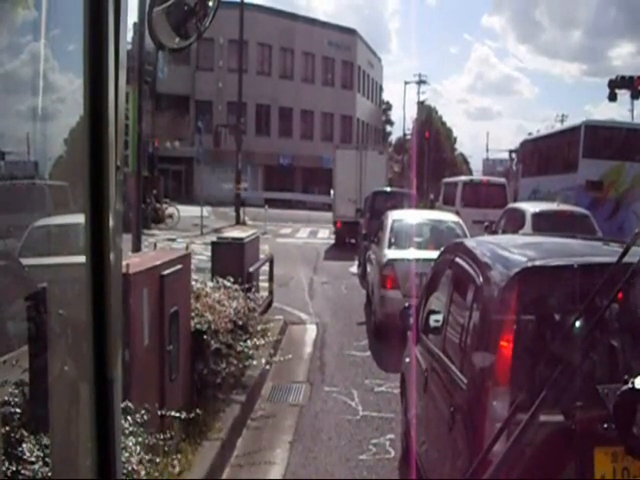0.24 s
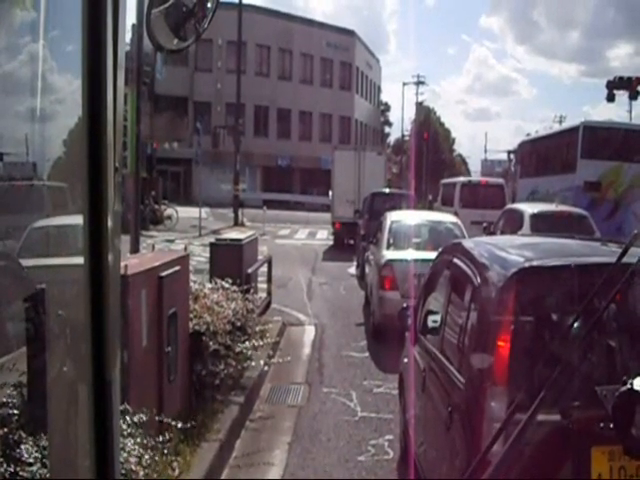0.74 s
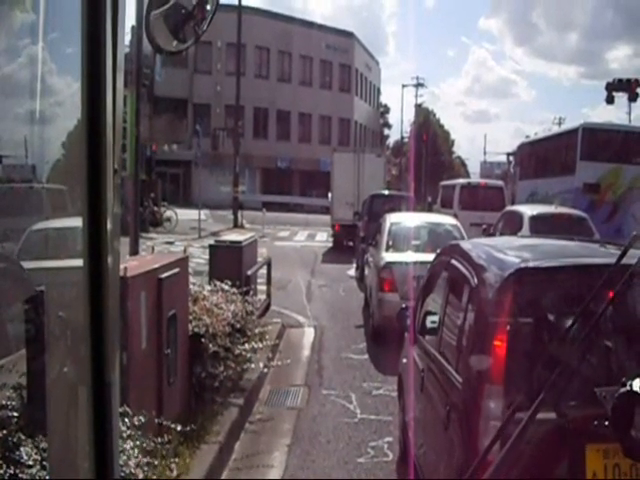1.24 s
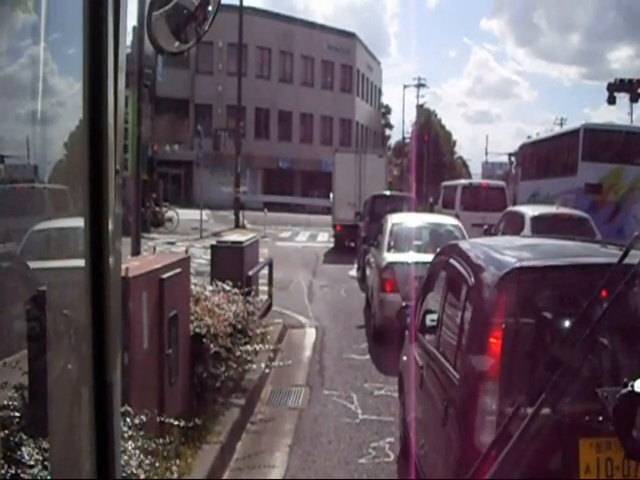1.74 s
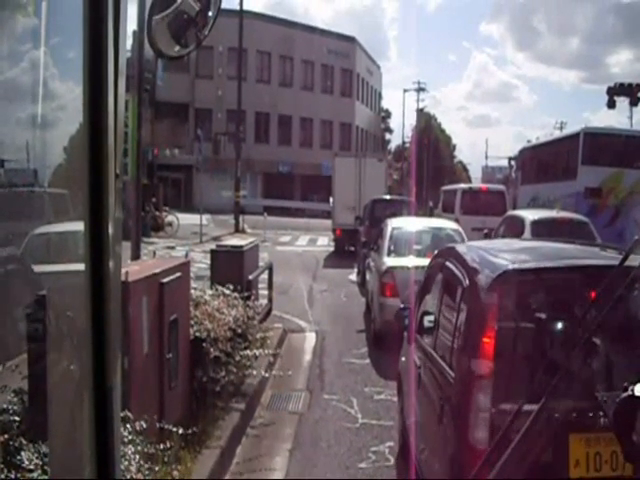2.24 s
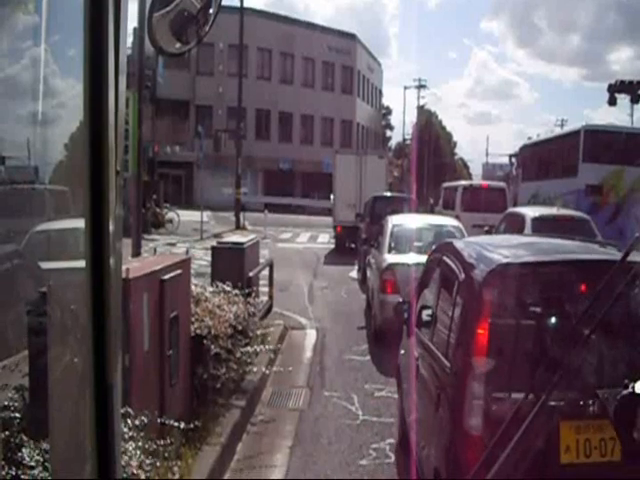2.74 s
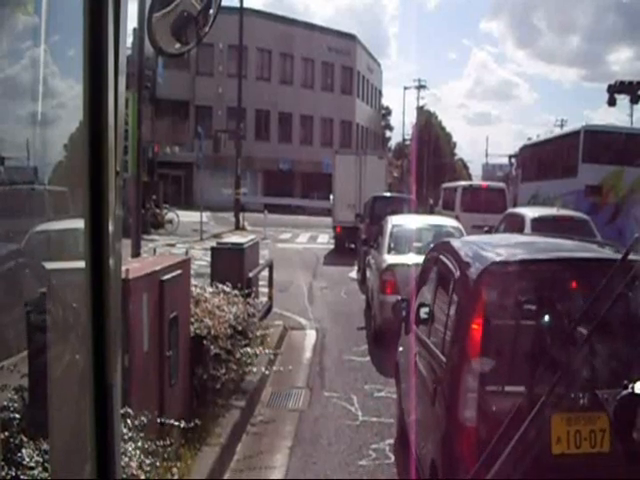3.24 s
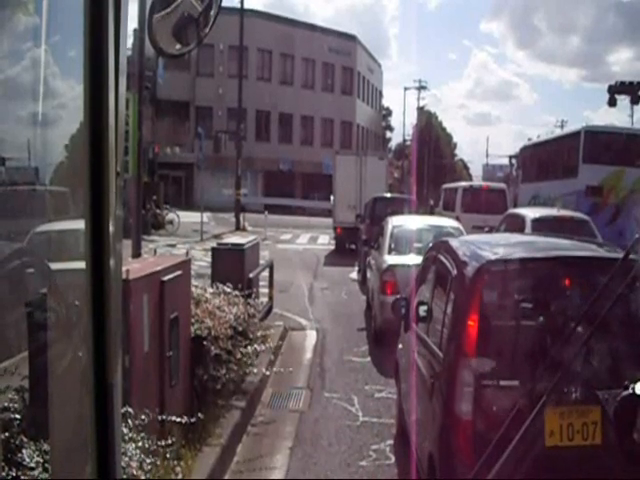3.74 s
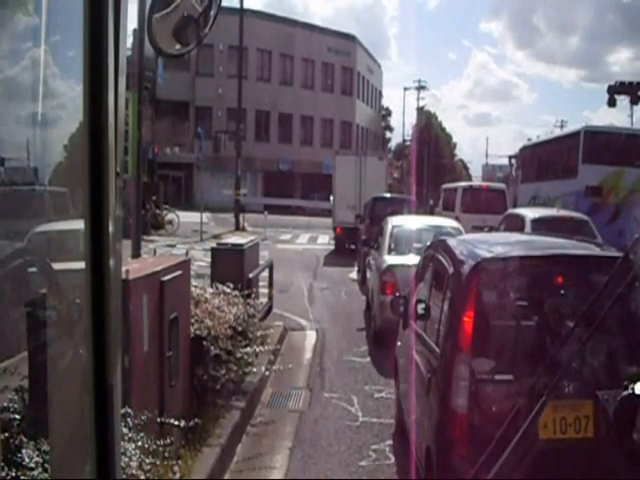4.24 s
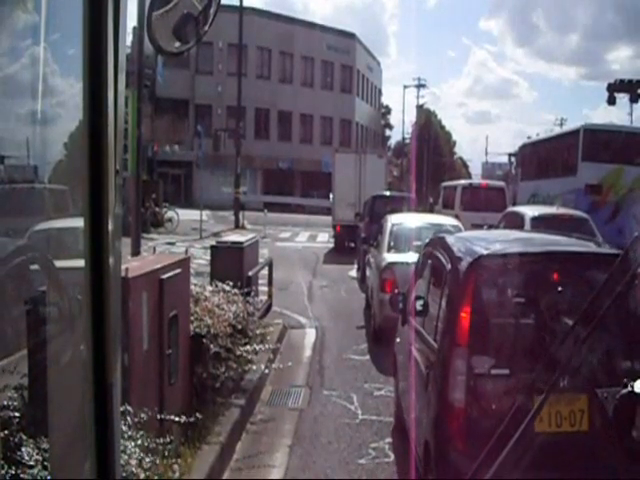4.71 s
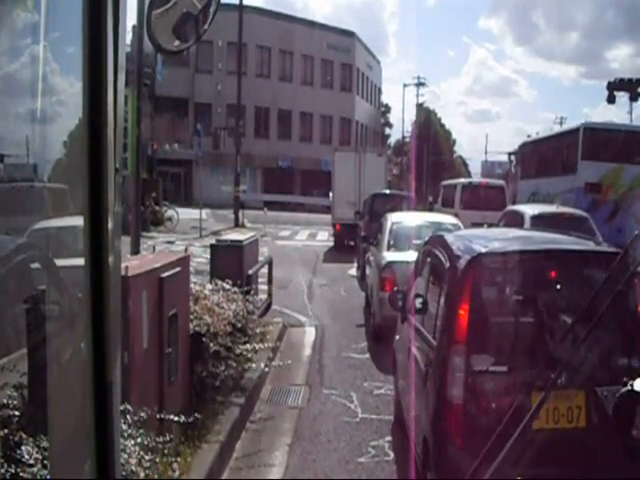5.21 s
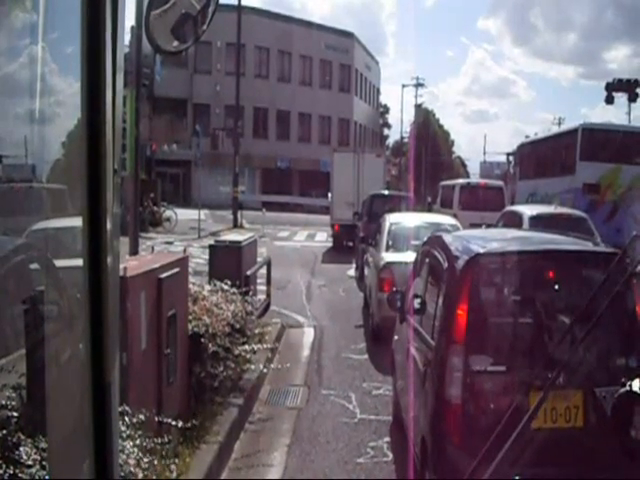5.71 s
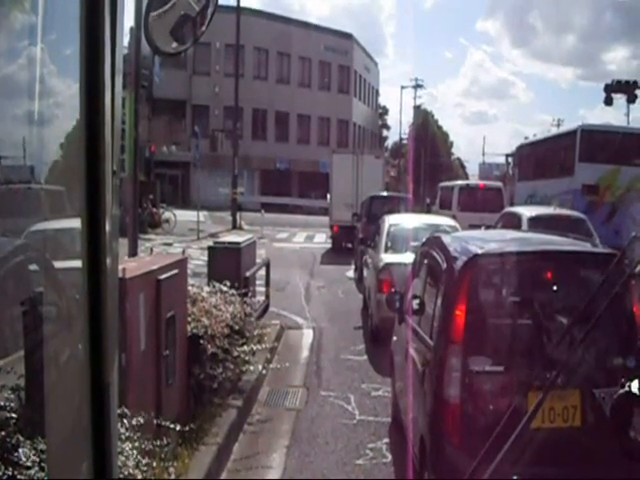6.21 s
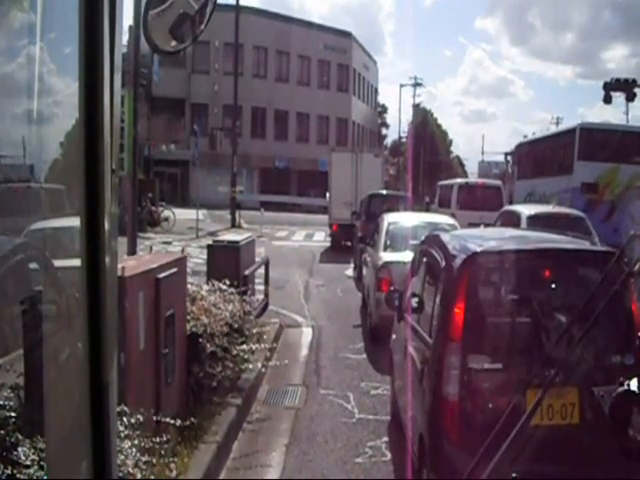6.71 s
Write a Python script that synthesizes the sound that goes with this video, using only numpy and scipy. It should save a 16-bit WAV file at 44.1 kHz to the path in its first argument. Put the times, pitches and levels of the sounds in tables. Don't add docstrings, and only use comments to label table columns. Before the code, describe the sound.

From a front seat of a stationary bus, crisp plastic-and-metal indicator strokes continue evenly from start to end, pull-in and brighter drop-out taking turns. The cabin is filled with low, wavering engine boom and soft roar. A few tiny trim creaks come early and around the middle. Fans and compressor hum underneath, with faint preamplifier hiss and a thin steady screen whine in a short, dry cabin echo.

```python
import sys
import numpy as np
from scipy import signal
from scipy.fft import rfft, irfft, next_fast_len
from scipy.io import wavfile
from scipy.ndimage import map_coordinates

SR = 44100
rng = np.random.default_rng(int(sys.argv[2]) if len(sys.argv) > 2 else 0)


def voltage_ratio(decibels):
    exponent = np.asarray(decibels, float) / 20
    return 10 ** exponent


def put_to_file(sound):
    columns = np.atleast_2d(sound).T
    safe = np.clip(columns, -1, 1)
    whole_steps = np.round(safe * 32767)
    wavfile.write(sys.argv[1], SR, whole_steps.astype(np.int16))


N = 306936

# frequency in Hz, level in dB.
SCREEN_LINES = [(15734.3, -73.5), (15747.3, -77.5), (15777.3, -92)]
COMPRESSOR_LINES = [(124.05, -50.5), (248.1, -53.5), (372.1, -65.5), (496.2, -60.5)]
BLOWER_LINES = [(235.3, -55), (470.6, -74)]
FAR_ENGINE_LINES = [(19.33, -54.5), (25.8, -54), (56.2, -51), (147.1, -58)]

# frequency in Hz, density in dB per Hz.
HISS_COLOUR = [(500, -24), (2000, -1), (6000, -2), (10000, -3.5), (13000, -4.5), (15700, -5)]
RUMBLE_COLOUR = [(8, -26), (16, -2.5), (40, -0.5), (70, -4.5), (82, -2.5), (103, -7.5), (122, -2.5),
                 (158, -11), (200, -10), (222, -15), (245, -11.5), (290, -24.5), (500, -50.5), (1500, -120)]
ROAR_COLOUR = [(150, -26), (300, -0.5), (500, -4.5), (900, -9), (1250, -13), (1500, -16), (3000, -21.5),
               (5000, -28.5), (9000, -40), (16000, -70)]
AISLE_COLOUR = [(100, -120), (152, -30), (165, -5), (172, 0), (179, -5), (194, -30), (300, -120)]

# multiple of shaft speed, level in dB.
SHAFT_ORDERS = [(2, -48.4), (10, -56), (12, -59), (15, -55), (21, -63)]
# offset from the boom in beats per second, level in dB, first swell in seconds.
BESIDE_FIRING = [(.92, -44, .086), (1.18, -51.7, .54), (-5.71, -51.4, .16)]
BESIDE_DOUBLE = [(-5.28, -49.5, .095), (3.85, -50.4, .248), (6.12, -54.7, .002)]
BESIDE_PANEL = [(-6.13, -53.9, .13), (-2.266, -44.6, .044), (5.36, -54.7, .114), (7.47, -56.5, .086)]

# start in seconds, level in dB, decay in seconds, centre in Hz.
TRIM_CREAKS = [(.21, -59, .025, 4000), (.295, -58, .03, 4000), (.67, -57.5, .025, 4500),
               (.832, -55, .03, 3500), (.845, -54, .045, 3300), (.978, -57.5, .025, 4000),
               (3.052, -63, .02, 3000), (3.131, -54.5, .025, 3200), (3.133, -55.5, .02, 1200),
               (3.18, -57.5, .07, 1230), (3.595, -59, .04, 2000)]

# frequency in Hz, T60 in seconds.
CABIN_T60 = [(500, 0.36), (3000, 0.45), (12000, 0.26)]
# time in seconds, ring level in dB.
PULL_STROKES = [(.1615, .5), (.848, 0), (1.5349, .5), (2.2245, .5), (2.9186, -1), (3.6049, -2),
                (4.2913, .5), (4.9807, -.5), (5.6692, 1), (6.3534, -1.5)]
DROP_STROKES = [(.5267, 1), (1.2128, .5), (1.8986, 0), (2.5936, 0), (3.2829, 0), (3.9698, 0), (4.6547, -.5),
                (5.351, -.5), (6.0312, 0), (6.717, 0)]
# frequency in Hz, level in dB, T60 in seconds, rise in seconds, delay in seconds.
PULL_MODES = [(900, -49, .05, .003, .008), (985, -52, .06, .003, .008), (1120, -50, .04, .0015, .001),
              (1820, -54.5, .045, .0015, .005), (2090, -53, .025, .0006, -.0005),
              (2380, -55.5, .03, .001, .005), (2720, -56.5, .05, .001, .0045), (3262, -65, .05, .001, .001),
              (3660, -57.5, .05, .0015, 0), (3785, -47, .04, .002, -.002), (3845, -61, .07, .002, .011),
              (8500, -69, .04, .0005, -.001)]
DROP_MODES = [(912, -32, .033, .006, .006), (970, -57, .15, .004, .009), (1125, -52, .07, .002, .003),
              (1545, -59, .06, .001, 0), (2740, -59, .11, .004, .008), (3830, -54, .035, .001, 0),
              (4112, -59.5, .1, .0007, -.0005), (3250, -57, .035, .001, .0015),
              (7030, -64, .04, .001, .001), (8090, -59.5, .055, .001, .001),
              (8385, -59.5, .045, .001, .001), (9141, -59, .04, .001, 0), (11025, -61, .04, .0015, .001),
              (13190, -66, .035, .0005, -.001)]
# time after the stroke in seconds, level in dB.
PULL_BOUNCES = [
    (.0008, -1.5),
    (.006, -1),
    (.009, -2),
    (.016, -11),
    (.024, -11),
]
DROP_BOUNCES = [
    (-.001, -1),
    (.002, 0),
    (.005, -2),
    (.0095, -4),
]
# frequency in Hz, level in dB.
GRAZE_COLOUR = [(3000, -20), (3800, 0), (6000, -8), (8500, 0), (15700, 2)]
PULL_CRACK_COLOUR = [(600, -20), (1200, -1), (2500, -1), (3000, -9), (4200, -10), (5500, -15), (7000, -24),
                     (15000, -24)]
DROP_CRACK_COLOUR = [(600, -20), (1500, -4), (3500, 0), (5000, .5), (9000, -2), (12500, -1), (15700, 2)]


def unit(x):
    return x / np.sqrt(np.mean(x ** 2) + 1e-20)


def along(points, hz):
    point_hz, value = np.transpose(points)
    return np.interp(np.log(hz + 1), np.log(point_hz + 1), value)


def wobble(rate_hz):
    knots = rng.standard_normal(int(N * rate_hz / SR) + 4)
    return map_coordinates(knots, [np.arange(N) * rate_hz / SR])


def noise(colour, size=N):
    padded = next_fast_len(size + 8192)
    gain = voltage_ratio(along(colour, np.fft.rfftfreq(padded, 1 / SR)))
    white = rng.standard_normal(padded)
    return unit(irfft(rfft(white) * gain, padded)[:size])


def tone(turns):
    return np.sqrt(2) * np.sin(2 * np.pi * (turns + rng.random()))


def hum(lines, drift, flutter_db):
    t_s = np.cumsum(1 + drift * wobble(2.5)) / SR
    return sum(voltage_ratio(db + flutter_db * wobble(5.4)) * tone(hz * t_s) for hz, db in lines)


def screens():
    return hum(SCREEN_LINES, drift=0, flutter_db=0)


def machines():
    far_engines = hum(FAR_ENGINE_LINES, drift=.003, flutter_db=1.5)
    compressor = hum(COMPRESSOR_LINES, drift=.0018, flutter_db=.8)
    blower = hum(BLOWER_LINES, drift=.002, flutter_db=1.2)
    return far_engines + compressor + blower


def beating(turns, boom_db, beside):
    turns = turns + rng.random()
    t_s = np.arange(N) / SR
    out = np.zeros(N)
    for beat_hz, db, swell_s in [(0, boom_db, 0)] + beside:
        phase = 2 * np.pi * (turns + beat_hz * (t_s - swell_s))
        out += voltage_ratio(db) * np.sqrt(2) * np.sin(phase)
    return out


def engine():
    shaft_hz, panel_hz = 9.065, 87.7
    shaft = np.cumsum(shaft_hz * (1 + 0.00098 * wobble(1.48))) / SR
    firing = 3 * shaft
    boom = beating(firing, -36.7, BESIDE_FIRING) + beating(2 * firing, -39.6, BESIDE_DOUBLE)
    panel = beating(panel_hz * np.arange(N) / SR, -44, BESIDE_PANEL)
    orders = sum(voltage_ratio(db + 0.51 * wobble(2.96)) * tone(round(k) * shaft) for k, db in SHAFT_ORDERS)
    push = np.cos(2 * np.pi * firing)
    rumble = voltage_ratio(-40.0 + 1.6 * push) * noise(RUMBLE_COLOUR)
    aisle = voltage_ratio(-49.5) * noise(AISLE_COLOUR)
    roar_db = -52 + 0.5 * push + 0.27 * wobble(1.14) + 0.35 * wobble(6.17)
    roar = voltage_ratio(roar_db) * noise(ROAR_COLOUR)
    return boom + panel + orders + rumble + aisle + roar


def creaks():
    out = np.zeros(N + SR)
    t_s = np.arange(SR // 2) / SR
    for start_s, db, decay_s, hz in TRIM_CREAKS:
        spread = np.clip(hz / 1700, 1.1, 2)
        colour = [(hz / spread ** 3, -40), (hz / spread, -4), (hz, 0),
                  (hz * spread, -6), (hz * spread ** 3, -30)]
        rub = noise(colour, size=len(t_s))
        envelope = (1 - np.exp(-t_s / 0.00078)) * np.exp(-t_s / abs(decay_s))
        out[round(start_s * SR):][:len(t_s)] += voltage_ratio(db) * rub * envelope
    return out[:N]


def cabin_tail():
    hz, t_s, grains = signal.stft(rng.standard_normal(SR // 4), SR, nperseg=256)
    decay = voltage_ratio(-60 * t_s / along(CABIN_T60, hz)[:, None])
    tail = signal.istft(grains * decay, SR, nperseg=256)[1]
    return np.pad(tail, (300, 0)) / np.linalg.norm(tail)


def stroke(modes, bounces, crack_colour, ring_db, crack_db, crack_t60_s, wet_db):
    t_s = np.arange(SR // 4) / SR
    ring, cracks = np.zeros((2, SR // 2))
    for hz, db, t60_s, rise_s, delay_s in modes:
        swell = (1 - np.exp(-t_s / rise_s)) ** 2
        decay = voltage_ratio(db + rng.normal(0, .8) - 60 * t_s / t60_s)
        ring[round((delay_s + .01) * SR):][:len(t_s)] += decay * swell * tone(hz * t_s)
    for after_s, db in bounces:
        decay = voltage_ratio(crack_db + db - 60 * t_s / crack_t60_s)
        cracks[round((after_s + .01) * SR):][:len(t_s)] += decay * noise(crack_colour, size=len(t_s))
    wet = signal.fftconvolve(cracks, cabin_tail())[:len(cracks)]
    return voltage_ratio(ring_db) * ring + cracks + voltage_ratio(wet_db) * wet


def pull_in(ring_db):
    graze = stroke([], [(-.0025, 0)], GRAZE_COLOUR, 0, crack_db=-58, crack_t60_s=.05, wet_db=-8)
    closing = stroke(PULL_MODES, PULL_BOUNCES, PULL_CRACK_COLOUR, ring_db,
                     crack_db=-51, crack_t60_s=.026, wet_db=-4)
    return graze + closing


def drop_out(ring_db):
    return stroke(DROP_MODES, DROP_BOUNCES, DROP_CRACK_COLOUR, ring_db,
                  crack_db=-51, crack_t60_s=.026, wet_db=-3.5)


def relay():
    out = np.zeros(N + SR)
    for strokes, strike in ((PULL_STROKES, pull_in), (DROP_STROKES, drop_out)):
        for time_s, ring_db in strokes:
            sound = strike(ring_db)
            out[round((time_s - .01) * SR):][:len(sound)] += sound
    return out[:N]


def scene():
    background = screens() + machines()
    return (background + engine() + creaks() + relay())[None]


def band_limit(x):
    return signal.sosfilt(signal.butter(12, 15960, fs=SR, output="sos"), x)


def record(dry):
    top_hz = 15790
    spectrum = rfft(dry + voltage_ratio(-61.5) * noise(HISS_COLOUR))
    spectrum = spectrum * (np.fft.rfftfreq(N, 1 / SR) < top_hz)
    return band_limit(irfft(spectrum, N))


dry = scene()
out = record(dry)
put_to_file(out)
```